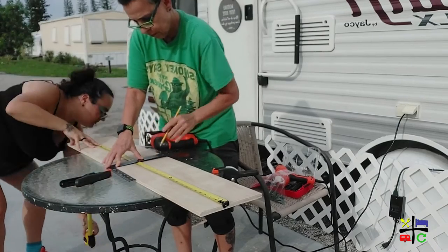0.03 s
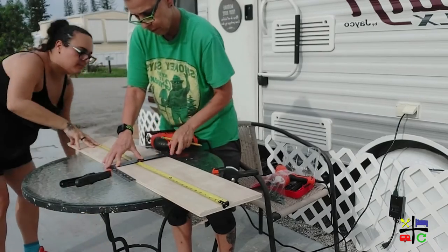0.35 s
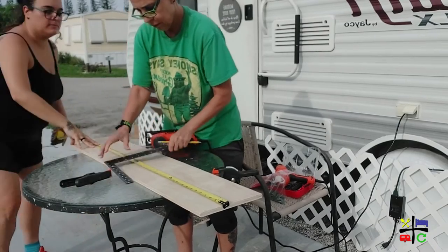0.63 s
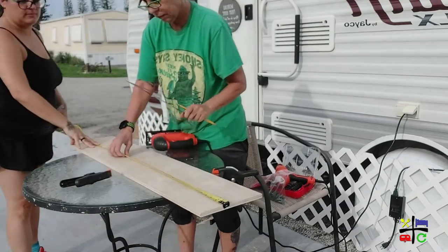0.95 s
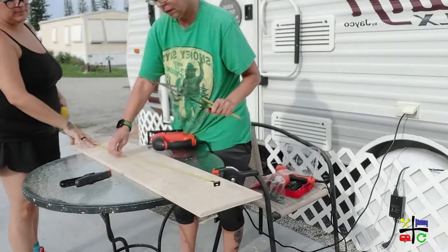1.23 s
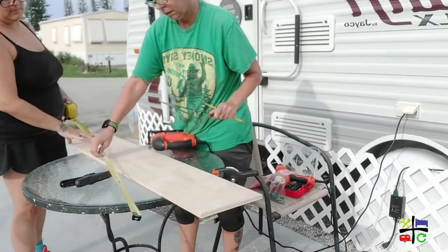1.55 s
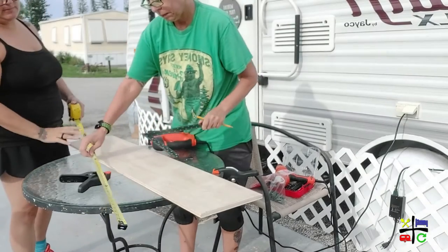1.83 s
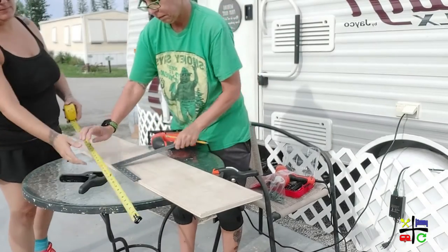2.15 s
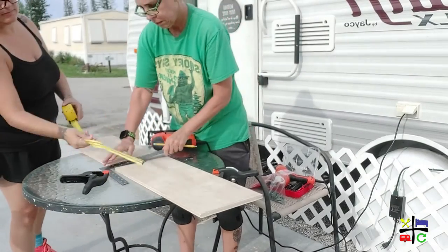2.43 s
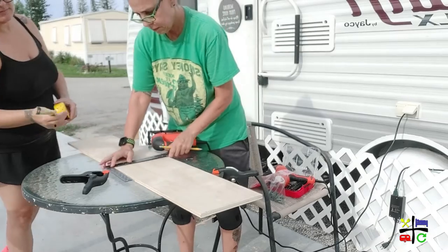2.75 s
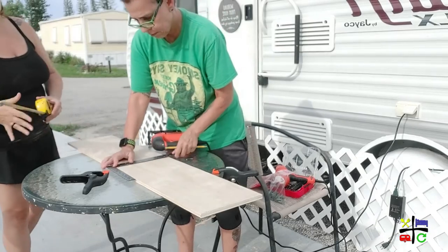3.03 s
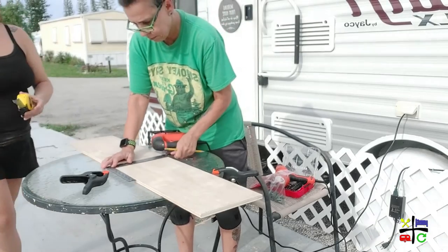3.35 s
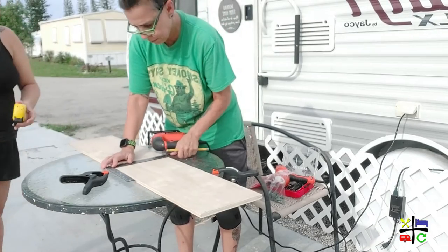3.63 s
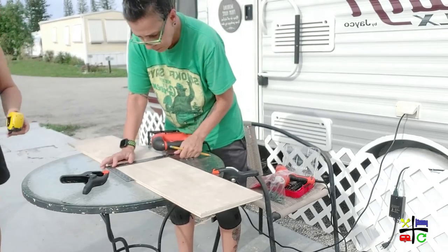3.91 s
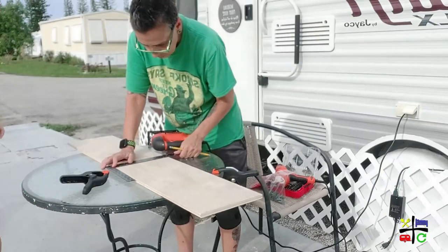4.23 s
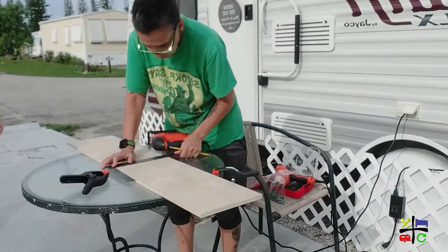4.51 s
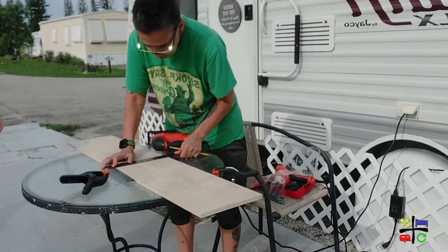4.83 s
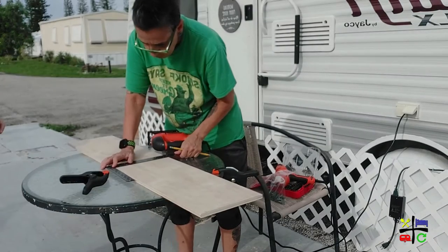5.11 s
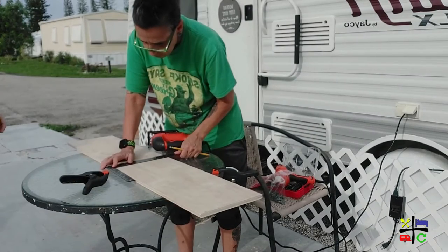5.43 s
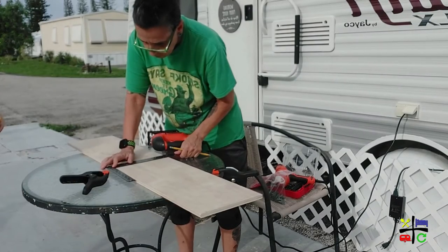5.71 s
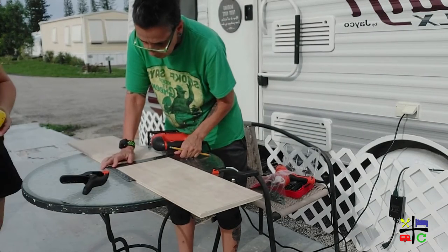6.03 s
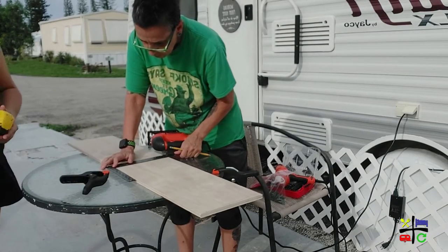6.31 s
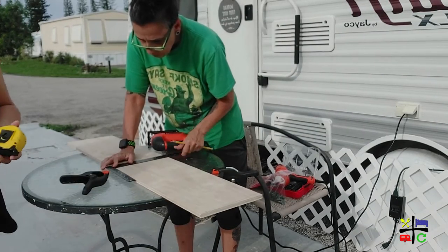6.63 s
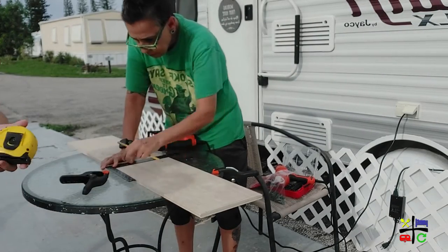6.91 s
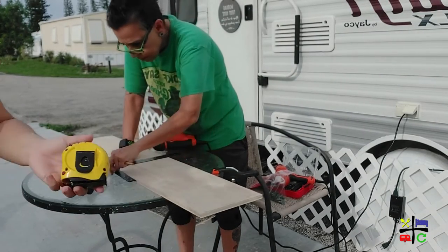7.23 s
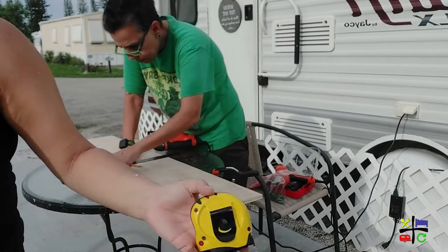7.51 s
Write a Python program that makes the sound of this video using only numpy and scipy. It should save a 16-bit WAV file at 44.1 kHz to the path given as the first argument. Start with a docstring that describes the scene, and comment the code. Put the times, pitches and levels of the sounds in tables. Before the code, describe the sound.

Tools are handled on a glass table about a metre and a half from the microphone, in open air. A steel square shifts, then a thin steel tape cracks and crinkles, rattling a plastic clamp. The square is set down and the tape zips in, clacking home. A scratchy pencil stroke on wood ends in dull knocks. Soft rubbing, a few plastic clacks and a click follow. Distant traffic and a light breeze rumble underneath.

```python
"""Marking a board on a glass patio table beside a trailer wall, over distant traffic and light air.
A steel square shifts. A steel tape is lifted off, snaps, drags over a plastic clamp and buckles.
The square is set down, the tape runs back into its case, and a small part clinks. At 5 s a pencil
sticks and slips along one line, running out with a short scrape as the board rocks. Fingers then
touch and rub the square; last, a hand knocks the clamp against the glass and the tape case clicks."""
import sys
import numpy as np
from scipy import signal
from scipy.fft import rfft, irfft
from scipy.io import wavfile
from scipy.ndimage import uniform_filter1d

SR = 44100
rng = np.random.default_rng(int(sys.argv[2]) if len(sys.argv) > 2 else 0)


def store_wav(level_fs):
    """Save 16-bit WAV to argv[1]."""
    pcm = np.round(np.clip(np.atleast_2d(level_fs), -1, 1) * 32767)
    wavfile.write(sys.argv[1], SR, pcm.T.astype(np.int16))


N = 337806
TIME = np.arange(N) / SR
FFT_SIZE = 2 ** 15
FREQ_HZ = np.maximum(np.arange(FFT_SIZE // 2 + 1) * SR / FFT_SIZE, 1)
STROKE_START_S, STROKE_LENGTH_S = 5.042, 0.41


def undb(db):
    """Decibels to gain."""
    return 10 ** (np.asarray(db) / 20)


def unit(x):
    """Scale to rms 1."""
    return x / np.sqrt(np.mean(np.abs(x) ** 2))


def filtered(x, response, taps=FFT_SIZE):
    """Apply a frequency response, one or one per ear."""
    impulse = irfft(response, FFT_SIZE)[..., :taps]
    y = signal.oaconvolve(np.atleast_2d(x), np.atleast_2d(impulse), axes=-1)
    return np.squeeze(y[:, :N])


def colour(points):
    """Causal response through (Hz, dB) points, from the folded cepstrum."""
    hz, db = np.transpose(points)
    gain = undb(np.interp(np.log(FREQ_HZ), np.log(hz), db))
    cepstrum = irfft(np.log(gain), FFT_SIZE)
    cepstrum[1:FFT_SIZE // 2] *= 2
    cepstrum[FFT_SIZE // 2 + 1:] = 0
    return np.exp(rfft(cepstrum))


def resonance(hz, width_hz):
    """One mode, gain 1 at its centre."""
    return 1 / (1 + 1j * (FREQ_HZ ** 2 - hz ** 2) / (FREQ_HZ * width_hz))


def ring(modes):
    """Summed response of (Hz, width Hz, dB) modes."""
    return sum(undb(db) * resonance(hz, width_hz) for hz, width_hz, db in modes)


def body(points, modes):
    """Response of an object: broad colour with modes ringing on top."""
    return unit(colour(points) * (1 + ring(modes)))


def walk(rate_hz):
    """Random held levels, smoothed twice; rms 1."""
    hold = int(SR / rate_hz)
    steps = np.repeat(rng.standard_normal(N // hold + 1), hold)
    return unit(uniform_filter1d(uniform_filter1d(steps, hold), hold)[:N])


def with_scatter(force, t60_s=0.0756, build_s=0.0018):
    """Rows: the force, then a diffuse copy per ear; the contact moves, so no echo pattern repeats."""
    t = TIME[:SR // 6]
    decay = (undb(-60 * t / t60_s) * (1 - np.exp(-(t / build_s) ** 2))) ** 2
    power = np.maximum(signal.oaconvolve(force ** 2, decay / decay.sum())[:len(force)], 0)
    return np.vstack([force, np.sqrt(power) * rng.standard_normal((2, len(force)))])


def blows(rows, crack):
    """Impact force: one crack, then dying chatter of loose parts; softer contacts cut off lower."""
    force, t = np.zeros((3, N + SR)), TIME[:SR // 4]
    for start_s, db, t60_s, cutoff_hz, *_ in rows:
        hit = rng.standard_normal(len(t)) * undb(-60 * t / t60_s)
        hit[0] = crack
        softness = signal.butter(2, cutoff_hz, fs=SR)
        start = int(start_s * SR)
        force[:, start:start + len(t)] += undb(db) * signal.lfilter(*softness, with_scatter(hit))
    return force[:, :N]


def moves(rows):
    """Sliding strength: up tenfold per attack time, held, down tenfold per release time."""
    strength = np.zeros(N)
    for peak_s, db, attack_s, hold_s, release_s in rows:
        before = np.maximum(peak_s - TIME, 0) / attack_s
        after = np.maximum(TIME - peak_s - hold_s, 0) / release_s
        strength += undb(db) * 10 ** -(before + after)
    return strength


def friction(strength, grain_db, catch_hz, catch_db):
    """Sliding force: dense tiny slips of unequal size, bunched where the surfaces catch."""
    catch = 2 * np.tanh(walk(catch_hz) / 2)
    noise = rng.standard_normal(N)
    slip_db = grain_db * np.minimum(rng.exponential(size=N), 5) + catch_db * catch
    return with_scatter(unit(noise * undb(slip_db)) * strength)


def stroke_speed():
    """Pencil speed: quick rise, slower fall; peak 1."""
    along = np.clip((TIME - STROKE_START_S) / STROKE_LENGTH_S, 0, 1)
    speed = along ** 0.62 * (1 - along) ** 1.6
    return speed / speed.max()


def echoes(build_s, t60_s):
    """Response of dense reflections, different at each ear; energy 1."""
    t = TIME[:FFT_SIZE]
    envelope = undb(-60 * t / t60_s) * (1 - np.exp(-(t / build_s) ** 2))
    tail = rng.standard_normal((2, FFT_SIZE)) * envelope
    return rfft(tail / np.sqrt(np.sum(tail ** 2, axis=1, keepdims=True)))


def place(x, lead_ms, pan_db, near_db, far_db):
    """Direct sound, earlier and louder on the left; scatter off table and wall; a faint yard tail."""
    lag = round(lead_ms * SR / 1000)
    direct = np.array([np.ones(len(FREQ_HZ)), np.exp(-2j * np.pi * FREQ_HZ * lag / SR)])
    tabletop = undb(-8.5) * echoes(build_s=0.00075, t60_s=0.048)
    yard = undb(far_db) * echoes(build_s=0.022, t60_s=0.4) * colour([(4000, 8), (15000, -4.5)])
    scatter = undb(near_db) * filtered(x[1:], colour([(100, -8), (1200, 0.5)]), taps=1024)
    ears = filtered(x[0], direct + tabletop + yard) + scatter
    shade = np.array([colour([(500, side * .5), (12000, side * pan_db / 2)]) for side in (1, -1)])
    return filtered(ears, shade, taps=256) / np.sqrt(1 + undb(2 * near_db))


def background():
    """Wavering traffic rumble, a far machine's hum and faint steady hiss."""
    # Traffic spectrum. Each row: frequency in Hz, gain in dB.
    traffic_colour = [(12, -58.5), (20, -28), (27, -25), (30, -19.5), (43, -5.5), (119, -1), (170, -7.5),
                      (223, -8.5), (253, -12.5), (287, -8.5), (361, -20), (505, -25), (967, -32.5),
                      (1410, -40), (3000, -54.5), (3900, -83.5), (6600, -120)]
    # Traffic stereo width. Each row: frequency in Hz, side minus mid in dB.
    side_colour = [(30, -9.5), (70, -24.5), (150, -12), (300, -9), (700, -0.5), (1500, 3), (4000, -2)]
    # Machine hum. Each row: frequency in Hz, level in dB.
    hum_tones = [(118, -54.5), (180, -61), (280, -63)]
    spectrum = unit(colour(traffic_colour))
    mid = filtered(rng.standard_normal(N), spectrum)
    side = filtered(rng.standard_normal(N), spectrum * colour(side_colour))
    swell = undb(-49 + .5 * walk(4.5) + 1.1 * walk(9))
    rumble = swell * (mid + side * np.array([[1], [-1]]))
    hum = sum(undb(db + walk(4)) * np.sin(2 * np.pi * np.cumsum(hz + 2.501 * walk(8)) / SR)
              for hz, db in hum_tones)
    hiss_colour = colour([(1000, -75.5), (3000, -75.5), (5000, -79), (7500, -80.5), (8800, -74),
                          (10500, -82), (16000, -82.5)])
    return rumble + hum + filtered(rng.standard_normal((2, N)), hiss_colour)


def breeze():
    """Light air buffets each microphone separately."""
    # Air puffs. Each row: peak time in s, level in dB, half-width in s.
    puffs = [(0.05, -44.5, 0.033), (0.31, -47, 0.19), (0.675, -48, 0.089), (1.088, -40, 0.041),
             (1.649, -37.5, 0.012), (2.56, -42.5, 0.011), (6.253, -47, 0.061)]
    gusts = sum(undb(db) * np.exp(-((TIME - s) / width_s) ** 2) for s, db, width_s in puffs)
    buffet = colour([(12, -34), (25, -18), (55, -2), (90, -3), (180, -17.5), (400, -28.5),
                     (1500, -68.5)])
    return (undb(-59.5) + gusts) * filtered(rng.standard_normal((2, N)), unit(buffet))


def clink(start_s=3.893, db=-48, t60_s=.04, cutoff_hz=9000):
    """A small hard part, tapped once, rings briefly."""
    # Modes of the part. Each row: frequency in Hz, width in Hz, gain in dB.
    modes = [(1610, 40, 6.5), (3020, 60, 3), (6530, 460, -6.5), (7900, 600, -10)]
    return filtered(blows([(start_s, db, t60_s, cutoff_hz)], crack=8.3), unit(ring(modes)))


def board():
    """The board drones under the moving pencil, then rocks on the table with dull knocks."""
    # Knocks on the table. Each row: start in s, level in dB, chatter t60 in s, cut-off in Hz.
    hits = [(5.4355, -35.5, 0.22, 1400), (5.457, -32, 0.03, 750), (5.473, -27, .02, 562),
            (5.510, -36, 0.2, 554)]
    # Wood colour. Each row: frequency in Hz, gain in dB.
    spectrum = [(80, -18), (220, -7.5), (400, -7.5), (560, -10), (800, -10.5), (1200, -14), (1500, -15),
                (5000, -15.5)]
    # Wood modes. Each row: frequency in Hz, width in Hz, dB over the colour.
    modes = [(227, 15, 2.2), (393, 23, 10.3), (457, 24, 2.7), (505, 18, 1.6), (593, 17, 9.1)]
    drag = friction(undb(-45.5) * stroke_speed() ** 0.15, grain_db=3.5, catch_hz=60, catch_db=1)
    drone_colour = colour([(100, 15.5), (250, 9), (400, -6.5), (650, 4), (1300, -15), (4000, -35)])
    drone = filtered(drag, drone_colour, taps=1024)
    return filtered(blows(hits, crack=17.7) + drone, body(spectrum, modes))


def clamp(rock_s=0.018, landing_cutoff_hz=1060, landing_t60_s=0.074, clack_t60_s=0.023):
    """The plastic clamp rocks on the glass: one side lands dully, then the other clacks down."""
    # Knocks. Each row: clack time in s, relative level in dB, cut-off in Hz, landing in dB re clack.
    knocks = [(1.663, -39, 5060, -5.5), (1.751, -31.5, 4600, -4), (1.833, -37, 5000, -11),
              (2.264, -45, 3546, 0), (7.1334, -31, 6100, -7), (7.2238, -34.5, 5030, -7),
              (7.2548, -47.5, 3360, -6.5), (7.346, -51.5, 1780, -20)]
    # Plastic colour. Each row: frequency in Hz, gain in dB.
    spectrum = [(120, -2), (330, 2), (520, -2), (780, -10), (1200, -5), (2000, -3.5), (2800, 0.5),
                (4000, -8.5), (7000, -8.5), (11000, -13), (16000, -22)]
    # Plastic modes. Each row: frequency in Hz, width in Hz, dB over the colour.
    modes = [(325.8, 28, 5), (465, 20, 1), (920, 44, -3.5), (1610, 77, 3.5), (2280, 77, 2), (2808, 27, -6),
             (3130, 180, -5.5), (3730, 97, -9.5)]
    landings = [(s - rock_s, db + landing_db, landing_t60_s, landing_cutoff_hz)
                for s, db, _, landing_db in knocks]
    clacks = [(s, db, clack_t60_s, hz) for s, db, hz, _ in knocks]
    return filtered(undb(6.5) * blows(landings + clacks, crack=8.3), body(spectrum, modes))


def steel_square():
    """The hand-damped square slides and clacks on the wood; light scrapes sound through its modes."""
    # Clacks. Each row: start in s, level in dB, chatter t60 in s, cut-off in Hz.
    hits = [(.574, -60.5, 0.034, 12000), (.6435, -31, 0.05, 17000), (.661, -31, 0.025, 10500),
            (.983, -59, 0.047, 8000), (2.520, -34, 0.061, 15500), (2.545, -47.5, 0.042, 14060),
            (2.781, -42, 0.061, 15740), (2.798, -39, .09, 14000), (2.833, -35.5, 0.029, 15000),
            (2.895, -46, 0.032, 15000)]
    # Slides. Each row: peak time in s, level in dB, attack, hold and release in s.
    slides = [(.1, -63, .4, 0.17, 0.36), (.68, -72, 0.25, .01, 0.26), (.99, -69.5, 0.098, 0.0033, 0.2),
              (2.56, -75.5, 0.054, .02, 0.27), (2.69, -73, 0.04, .07, .05),
              (2.795, -44, 0.013, 0.034, .015), (2.88, -58, .02, .01, .08)]
    # The pencil stroke runs out with a short scrape; then fingers rub the square. Columns as slides.
    scrapes = [(5.46, -56.5, 0.044, 0.0092, .15), (5.78, -79, .3, .02, 0.19), (6.02, -74, 0.2, .02, 0.3),
               (6.18, -71, 0.033, .02, .16), (6.66, -71.5, 0.073, 0.2, .2), (7.6, -63.5, 0.16, 0.054, .1)]
    # Steel colour. Each row: frequency in Hz, gain in dB.
    spectrum = [(150, -24), (500, -9), (750, -3), (1200, -8), (2400, -6), (4500, 0), (7000, -2),
                (9500, -1.5), (14000, -4), (16000, -8.5)]
    # Steel modes. Each row: frequency in Hz, width in Hz, dB over the colour.
    modes = [(1983, 47, 0.5), (2500, 30, 5), (3366, 38, 6.5), (4517, 37, 0.5), (5100, 60, -3.5),
             (6300, 21, -2.5), (9060, 90, 1), (14820, 200, 1)]
    clacks = blows(hits, crack=3.4)
    sliding = friction(moves(slides), grain_db=2.5, catch_hz=330, catch_db=3)
    scraping = friction(moves(scrapes), grain_db=3.5, catch_hz=54, catch_db=5)
    return filtered(clacks + sliding + scraping, body(spectrum, modes))


def pencil(touch_s=0.043, tick_t60_s=.022):
    """Graphite brushes the wood, then sticks and slips over the grain; the board radiates it."""
    # Pencil point landing and catching, then faint ticks as the square is touched.
    # Each row: start in s, level in dB, cut-off in Hz.
    ticks = [(5.0453, -38.5, 16000), (5.0815, -33, 17000), (5.106, -31, 13000), (5.247, -34, 7950),
             (5.279, -38, 5000), (5.3226, -29.5, 12200), (5.385, -46, 9000), (5.456, -42, 12200),
             (5.794, -58, 9200), (6.08, -58, 9040), (6.81, -54.5, 6000)]
    # Colour of pencil on wood. Each row: frequency in Hz, gain in dB.
    spectrum = [(120, -24), (250, -9), (600, 0.5), (950, -5), (1300, 0), (1650, -9.5), (2100, 1),
                (2800, -3.5), (4000, 1), (6500, -1.5), (10000, -1), (14000, 4), (16000, -5)]
    # Its modes. Each row: frequency in Hz, width in Hz, dB over the colour.
    modes = [(1901, 22, 10.5), (3327, 54, 8), (4000, 300, -8), (5260, 120, 3), (5760, 150, -3),
             (6600, 140, -16), (7660, 130, -32)]
    touch = moves([(STROKE_START_S - touch_s, -63.5, touch_s, touch_s, touch_s)])
    sliding = friction(undb(-39) * stroke_speed() + touch, grain_db=6, catch_hz=170, catch_db=3.5)
    graphite = colour([(2000, 1.5), (7000, 0), (11000, -7.5), (16000, -9.5)])
    ticking = blows([(s, db, tick_t60_s, hz) for s, db, hz in ticks], crack=9.8)
    return filtered(ticking + filtered(sliding, graphite, taps=256), body(spectrum, modes))


def tape_case():
    """The spring winds the blade in; the hook hits the mouth, rings the hollow shell and seats."""
    # Hook, lock and case impacts. Each row: start in s, level in dB, chatter t60 in s,
    # cut-off in Hz, shell drive and hook drive in dB re that level.
    hits = [(3.221, -54, 0.021, 12000, -10, -16.5), (3.2606, -45.5, 0.022, 8000, -9, 2),
            (3.331, -50.5, 0.085, 14000, -10, -8), (3.450, -37.5, 0.04, 15000, -5.5, -29.5),
            (3.516, -32.5, 0.056, 16000, -11, -17), (3.522, -21.5, 0.025, 16000, 5, -3.5),
            (3.562, -37.5, 0.038, 11950, -13, -2), (3.5654, -25, 0.0093, 12000, -9, 8),
            (3.6339, -28, 0.0086, 1790, -12, -19), (7.657, -34, .02, 6000, -4, -9.5)]
    # Spring rewind. Each row: peak time in s, level in dB, attack, hold and release in s.
    rewind = [(3.11, -62.5, 0.054, 0.014, 0.6), (3.53, -43.5, 0.19, .01, 0.011)]
    # Case colour. Each row: frequency in Hz, gain in dB.
    spectrum = [(150, -25), (450, -1.5), (1200, -8.5), (2100, -7.5), (2900, -7.5), (4500, 1), (7000, 2.5),
                (10000, -4.5), (13000, 4), (16000, -5.5)]
    # Case and steel hook modes. Each row: frequency in Hz, width in Hz, dB over the colour.
    case_modes = [(1744, 51, 6), (2700, 19, 5.5), (5010, 135, -9.5), (9365, 400, -15)]
    hook_modes = [(2798, 88, 7.5), (3140, 190, 5), (3720, 230, 4.5), (4100, 620, 3.5), (4560, 140, -6.5)]
    on_case = blows(hits, crack=4.8)
    winding = friction(moves(rewind), grain_db=4.5, catch_hz=78, catch_db=4)
    slither = unit(colour([(400, -18), (2000, -13), (3200, -1), (5200, 0), (7000, -1), (9500, -1),
                           (12000, 0.5), (16000, -5)]))
    on_shell = blows([(s, db + shell_db, t60, hz) for s, db, t60, hz, shell_db, _ in hits], crack=7.9)
    on_hook = blows([(s, db + hook_db, t60, hz) for s, db, t60, hz, _, hook_db in hits], crack=11)
    shell = undb(14.5) * filtered(on_shell, resonance(hz=757, width_hz=21))
    # The small hook radiates only around its own modes.
    hook_colour = colour([(2000, -12), (2700, -1.5), (4600, -3.5), (7000, -26)])
    hook = filtered(on_hook, ring(hook_modes) * hook_colour)
    return filtered(on_case, body(spectrum, case_modes)) + shell + hook + filtered(winding, slither)


def left_thump(start_s, db, hz):
    """A short low thump on the left at 1.37 s."""
    phase = np.maximum(TIME - start_s, 0) * 2 * np.pi * hz
    return undb(db) * (TIME >= start_s) * (1 - phase) * np.exp(-phase) * np.array([[1], [0]])


def tape_blade():
    """Thin curved steel crinkles as it drags and cracks when it kinks."""
    # Snaps and buckles. Each row: start in s, level in dB, chatter t60 in s, cut-off in Hz.
    hits = [(1.312, -51, .05, 14100), (1.3665, -16, .05, 17020), (1.522, -46.5, .08, 12300),
            (1.644, -42, .1, 14200), (1.820, -33.5, .093, 8990), (2.002, -49, .19, 12060),
            (2.033, -43, .15, 6990), (2.314, -27, .12, 14910), (2.333, -17.5, .11, 17960),
            (2.3425, -12, .045, 17000)]
    # Drags. Each row: peak time in s, level in dB, attack, hold and release in s.
    slides = [(1.42, -57.5, 0.25, .1, 0.077), (1.665, -47.5, 0.023, .01, .1),
              (1.78, -46, .13, 0.081, 0.088), (2.09, -53, 0.075, 0.0078, 0.037),
              (2.32, -29.5, 0.11, .035, 0.036), (2.46, -43, 0.059, 0.011, 0.038)]
    # Blade colour. Each row: frequency in Hz, gain in dB.
    spectrum = [(100, -26), (350, -19), (700, -10), (1100, -12.5), (2000, -6), (3000, -5), (4000, -1),
                (5400, -1), (7000, -3), (9500, -2.5), (13000, -1.5), (16000, -5)]
    # Blade modes. Each row: frequency in Hz, width in Hz, dB over the colour.
    modes = [(1620, 80, -3), (5040, 44, -3), (5567, 40, -4), (6980, 40, 1.5), (7100, 110, 0.5),
             (11750, 50, -3), (13000, 66, -2.5), (13100, 50, 0), (15306, 70, -3)]
    snaps = blows(hits, crack=6.1)
    crinkle = friction(moves(slides), grain_db=3.5, catch_hz=200, catch_db=4.5)
    return filtered(snaps + crinkle, body(spectrum, modes))


def scene():
    """The things on the table, about 1.5 m away, over air and traffic."""
    return (place(tape_blade(), lead_ms=0.15, pan_db=3.5, near_db=-0.5, far_db=-23)
            + place(tape_case(), lead_ms=0.23, pan_db=4, near_db=-5, far_db=-29.5)
            + place(steel_square(), lead_ms=0.17, pan_db=4, near_db=4, far_db=-21)
            + place(clink(), lead_ms=0.23, pan_db=0.5, near_db=-6, far_db=-20)
            + place(clamp(), lead_ms=0.09, pan_db=1.5, near_db=-1.5, far_db=-25.5)
            + place(pencil(), lead_ms=0.27, pan_db=5, near_db=-3.5, far_db=-18)
            + place(board(), lead_ms=0.36, pan_db=0, near_db=-6.5, far_db=-21)
            + left_thump(start_s=1.3667, db=-14, hz=110) + breeze() + background())


def record(dry):
    """Steep low-pass on the top treble."""
    cutoff_hz = 16050
    return signal.sosfilt(signal.ellip(10, .2, 70, cutoff_hz, fs=SR, output="sos"), dry)


dry = scene()
out = record(dry)
store_wav(out)
```